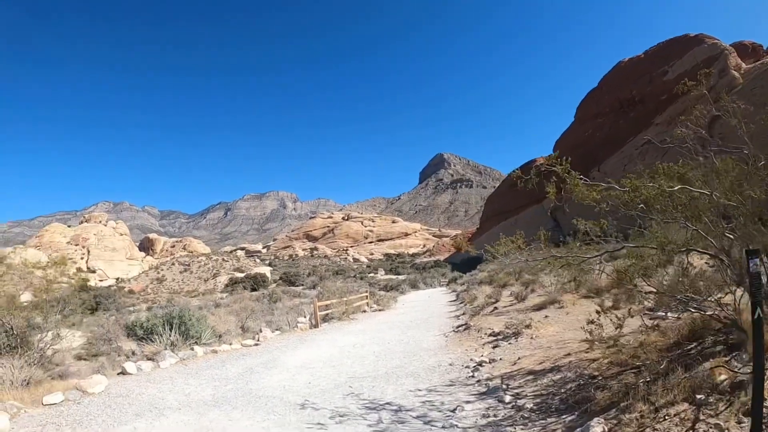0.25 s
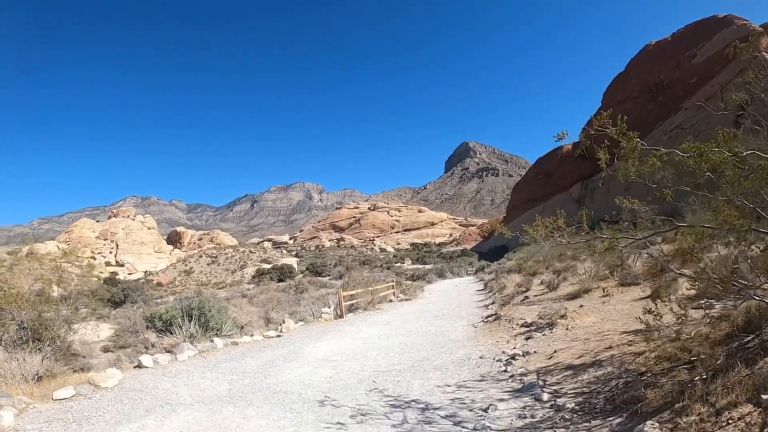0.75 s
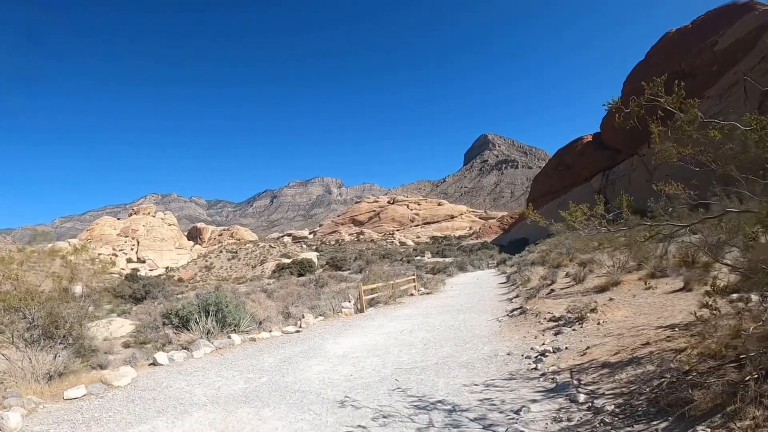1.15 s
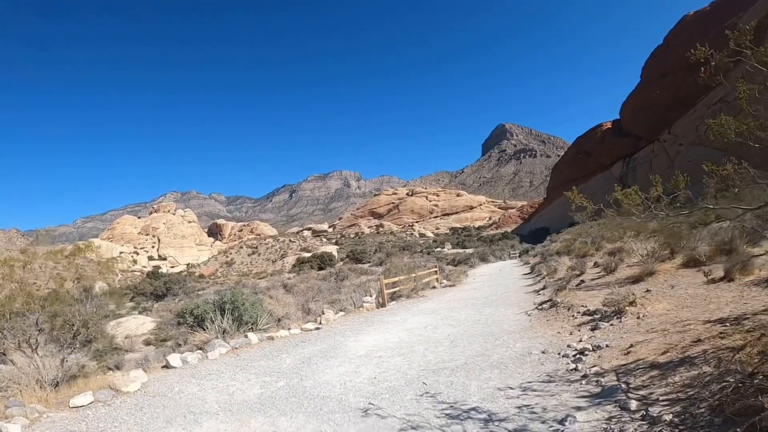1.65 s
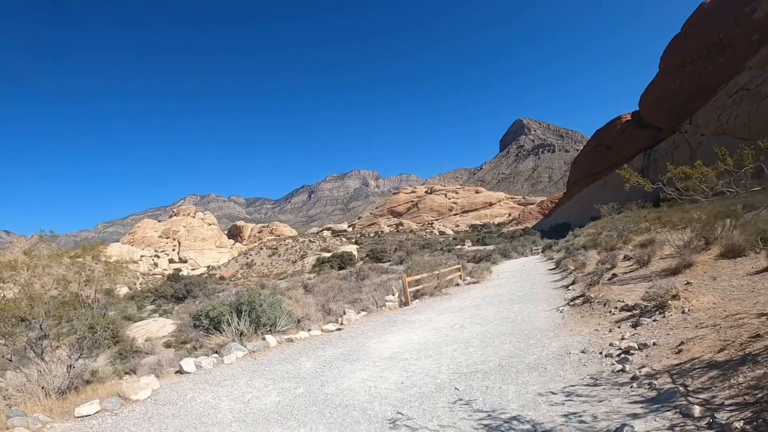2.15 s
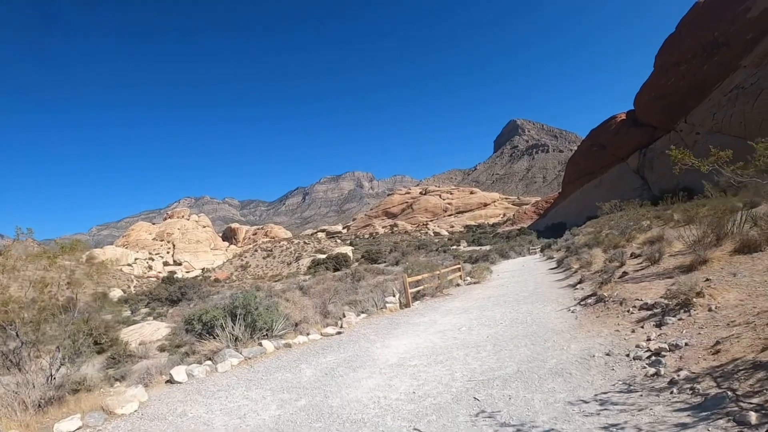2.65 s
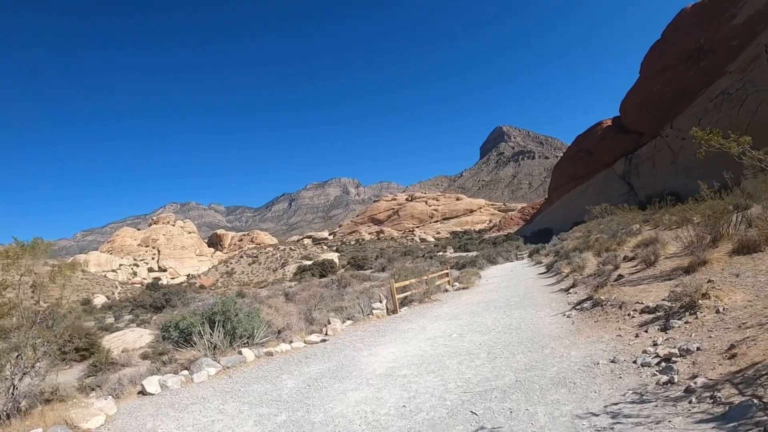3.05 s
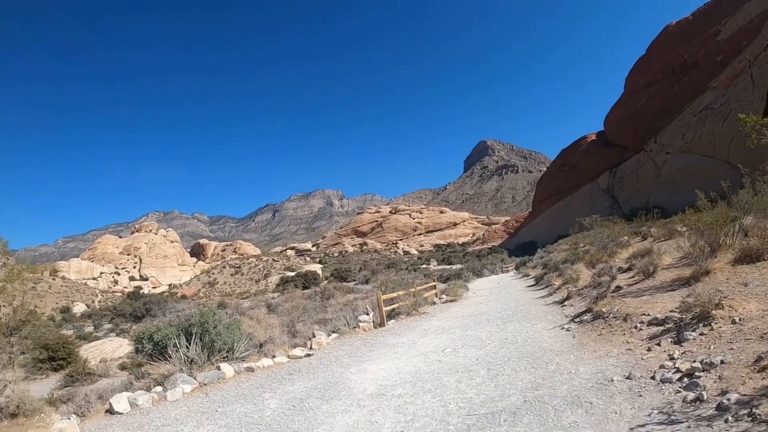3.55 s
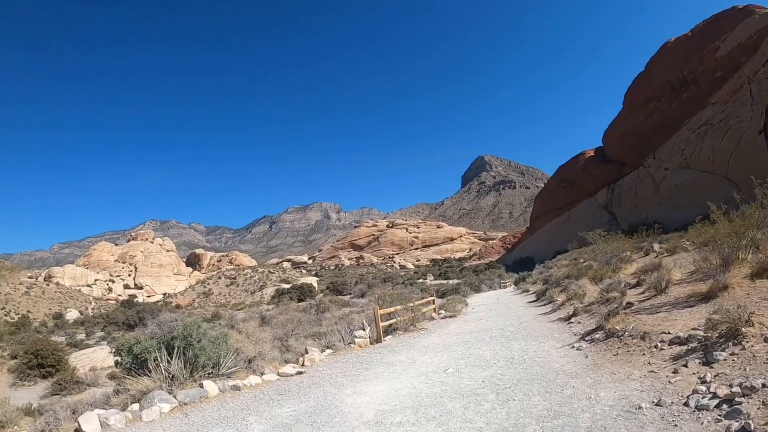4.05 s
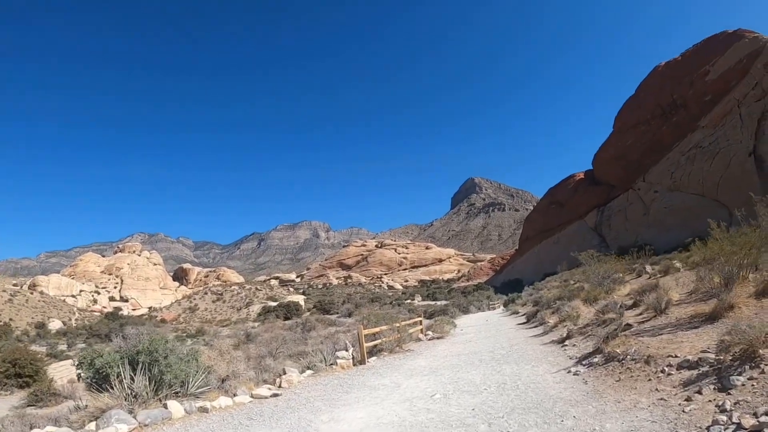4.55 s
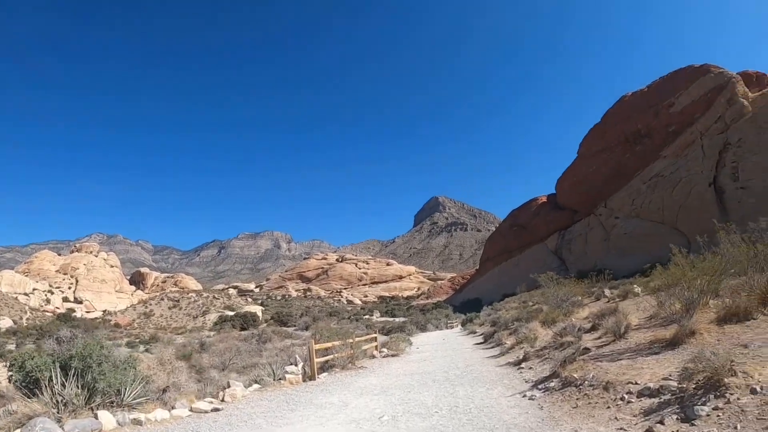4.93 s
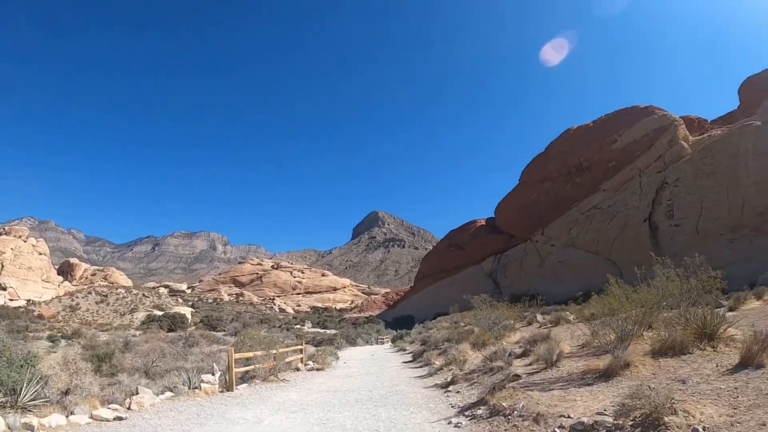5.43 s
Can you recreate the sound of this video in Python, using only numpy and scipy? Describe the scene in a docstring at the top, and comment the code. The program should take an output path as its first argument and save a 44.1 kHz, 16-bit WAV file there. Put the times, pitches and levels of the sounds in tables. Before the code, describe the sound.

Footsteps crunch steadily on gravel over low wind rumble, ending with a clothing rustle and a loud scrape across the microphone.

```python
"""Gravel walk, hand-held in the wind

Shoes crunch along a gravel trail: stones grind and crack as each foot rolls from heel to toe.
Wind buffets the two microphone ports of a small hand-held camera, over a far engine drone,
and a metal fitting tinkles now and then. Near the end clothing swishes, then a hand rubs
the case and scrapes across the left port, overloading it."""
import sys
import numpy as np
from scipy import signal
from scipy.fft import rfft, irfft, next_fast_len
from scipy.io import wavfile
from scipy.ndimage import uniform_filter1d

SR = 44100
rng = np.random.default_rng(int(sys.argv[2]) if len(sys.argv) > 2 else 0)


def pcm_store(signal):
    """Save signal as 16-bit PCM."""
    levels = np.round(np.clip(np.atleast_2d(signal), -1, 1) * 32767)
    wavfile.write(sys.argv[1], SR, levels.astype(np.int16).T)


N = 250929


def amp(db):
    """Decibels to gain."""
    return 10 ** (np.asarray(db) / 20)


def unit_rms(x):
    """Scales to rms 1."""
    return x / np.sqrt(np.mean(x ** 2) + 1e-20)


def wander(samples, shape=N):
    """Smooth random modulation at rms 1; more samples make it slower."""
    return unit_rms(uniform_filter1d(uniform_filter1d(rng.standard_normal(shape), samples), samples))


def automation(rows):
    """One curve for each column after the time; the first, a level, is silent outside the rows."""
    time_s, level_db, *others = np.transpose(rows)
    t = np.arange(N) / SR
    fader_db = uniform_filter1d(np.interp(t, time_s, level_db, left=-120, right=-120), size=90)
    return [fader_db] + [np.interp(t, time_s, column) for column in others]


def eq(x, points, phase_rad=0):
    """Shapes x with a curve of (freq_hz, gain_db) points and an optional phase shift."""
    size = next_fast_len(N)
    freq_hz, gain_db = np.transpose(points)
    bins_hz = np.fft.rfftfreq(size, 1 / SR)
    gain = amp(np.interp(np.log(bins_hz + 1), np.log(freq_hz + 1), gain_db))
    return irfft(rfft(x, size) * gain * np.exp(1j * phase_rad), size)[..., :N]


def band(x, lo_hz, hi_hz):
    """Gentle band-pass."""
    return signal.sosfilt(signal.butter(2, [lo_hz, hi_hz], "bandpass", fs=SR, output="sos"), x)


def resonate(x, hz, width_hz):
    """Two resonators in series, whose pitch may glide; comes out at rms 1."""
    carrier = np.exp(2j * np.pi * np.cumsum(hz * np.ones(N)) / SR)
    pole = np.exp(-np.pi * width_hz / SR)
    for _ in range(2):
        x = 2 * (carrier * signal.lfilter([1 - pole], [1, -pole], x / carrier)).real
    return unit_rms(x)


def ring(hz, t60_s, rise_s):
    """A damped ring with a soft attack, peak near 1."""
    t = np.arange(900) / SR
    envelope = (1 - np.exp(-t / rise_s)) * amp(-60 * t / t60_s)
    return envelope / envelope.max() * np.sin(2 * np.pi * hz * t)


def struck(hits, t60_s, rise_s):
    """One ring for each (start_s, level_db, pitch_hz), faded out within 20 ms."""
    out = np.zeros(N)
    fade = np.cos(np.linspace(0, np.pi / 2, 900)) ** 2
    for start_s, level_db, hz in hits:
        out[round(start_s * SR):][:900] += amp(level_db) * ring(hz, t60_s, rise_s) * fade
    return out


def pan(pan_db):
    """Left and right gains, pan_db apart; positive leans left."""
    return amp(np.array([[.5], [-.5]]) * pan_db)


def spread(x, width):
    """Nearly mono: a short scatter is added at one port and subtracted at the other."""
    scatter = rng.standard_normal(200) * np.exp(-np.arange(200) / 25)
    side = width * signal.oaconvolve(x, scatter / np.linalg.norm(scatter))[:N]
    return np.array([x + side, x - side])


def air(level_db=-52):
    """A quiet, wide bed of open air."""
    # tone of the open air: freq_hz, gain_db
    air_eq = [(35, -24), (60, 6), (102, -9), (163, -3), (290, -9), (395, -16), (643, -28), (858, -31),
              (1400, -27.5), (5280, -44), (7530, -38), (10000, -78), (12000, -94.5), (15600, -110),
              (22000, -120)]
    a, b = eq(rng.standard_normal((2, N)), air_eq)
    return amp(level_db) * unit_rms(np.array([a + 0.3 * b, a - 0.37 * b]))


def drone():
    """A far engine: low tones that waver together in pitch and level."""
    # engine tones: pitch_hz, waver_hz, level_db
    tones = [(151.8, 3.16, -48.5), (233.7, 4, -56), (270, 6.9, -57.5)]
    waver = wander(4000)
    return sum(amp(db + 2.8 * waver) * np.sin(2 * np.pi * np.cumsum(hz + waver_hz * waver) / SR)
               for hz, waver_hz, db in tones)


def wind(lumpy_db=3.0, gusty_db=2.0, sway_db=-43.5):
    """Eddies push each port's membrane: lumpy rumble and flutter, over the deep sway of the held case."""
    # wind on the ports: time_s, level_db, flutter_over_rumble_db, pan_db
    breeze = [(0, -39, -13, 1), (.17, -53, -2, -5), (.28, -24.5, -18, -0.5), (.62, -25.5, -15.5, -1.5),
              (.78, -37.5, -6.5, 0), (.94, -46, -8, -1), (1.05, -35.5, -21.5, 0), (1.58, -45.5, -1.5, -1),
              (1.67, -29.5, -17, -0.5), (1.93, -27, -18.5, -1), (2.13, -37.5, -7, -4.5),
              (2.4, -36.5, -5, 1), (2.7, -50.5, 1, -1.5), (3.1, -40.5, -6, -2), (3.47, -36.5, -14, -3.5),
              (3.63, -46, 6, -3.5), (3.72, -31.5, -17.5, 0.5), (3.96, -22.5, -13.5, 7.5),
              (4.03, -15.5, -23, -14.5), (4.17, -29, -9, -9.5), (4.35, -29.5, -5.5, -11),
              (4.45, -22, -1, -18.5), (4.63, -34, -10, -3), (4.86, -18, -3.5, -19), (5.0, -29, -7.5, -6.5),
              (5.25, -39.5, 6, -0.5), (5.52, -33.5, 0, 7), (5.63, -50, -1, -4.5), (5.69, -40, -0.5, 1)]
    level_db, flutter_db, pan_db = automation(breeze)
    a, b = rng.standard_normal((2, N))
    coherence = 0.85 * np.exp(-abs(pan_db) / 14)  # a gust on one port leaves the other alone
    eddies = np.array([a, coherence * a + np.sqrt(1 - coherence ** 2) * b])
    lumps, gusts = wander(900), wander(3000, (2, N))
    rumble = eq(eddies, [(8, -23), (25, 5), (65, 0.5), (110, -11), (200, -31), (500, -140)])
    rumble = unit_rms(rumble) * unit_rms(amp(gusty_db * gusts)) * unit_rms(amp(lumpy_db * lumps))
    flutter = eq(eddies, [(60, -15), (115, -4.5), (200, -11), (330, -21.5), (500, -42.5), (1200, -140)])
    flutter = amp(flutter_db + 2.5 * lumps) * unit_rms(flutter)
    sway = eq(eddies[:, ::-1], [(8, -22), (22, 3.5), (36, -6.5), (60, -33), (200, -140)])
    ratio = amp(pan_db)
    balance = np.array([ratio, np.ones(N)]) * np.sqrt(2 / (1 + ratio ** 2))  # constant power
    return amp(sway_db) * unit_rms(sway) + amp(level_db) * balance * (rumble + flutter)


def wind_thumps():
    """Sudden pushes on the right port's membrane, each with a dip before and after it."""
    # wind buffets: cue_s, relative_db, length_s
    buffets = [(4.019, -2.5, 0.0075), (4.042, -30, 0.0055), (4.111, -10, 0.0052), (4.127, -11.5, 0.008),
               (4.232, -14, 0.0105), (4.27, -15, 0.011), (4.319, -16, 0.0037), (4.396, -14, 0.0062),
               (4.407, -25, 0.0071), (4.437, -14, 0.0058), (4.523, -9, 0.0038), (4.723, -15, 0.0069),
               (4.852, -15.5, 0.019), (4.961, -20, 0.0084), (4.992, -17.5, 0.0039), (5.131, -21.5, 0.01)]
    out, t = np.zeros((2, N)), np.arange(-3000, 3000) / SR
    for cue_s, db, length_s in buffets:
        u = 2 * t / length_s
        centre = round((cue_s + .004) * SR)
        out[1, centre - 3000:centre + 3000] += amp(db + 2.5) * (1 - u ** 2) * np.exp(-u ** 2 / 2)
    return out


def tinkle(pitch_hz=8420):
    """A small metal fitting chatters: quick ticks into one high mode."""
    # ticks of the fitting: start_s, level_db
    ticks = [(0.1083, -41.5), (0.8948, -59), (1.3364, -46), (1.3464, -41), (1.36, -42), (1.3734, -43),
             (1.389, -42.5), (1.404, -49), (1.414, -45), (1.4386, -65), (1.4676, -55), (1.4854, -59),
             (2.1111, -65), (2.1294, -69), (3.1627, -65.5)]
    return struck([(start_s, db, pitch_hz) for start_s, db in ticks], t60_s=0.059, rise_s=0.00061)


def rustle():
    """Clothing swishes, then a hand rubs the case: a midrange body and a bright hiss, wide in stereo."""
    # clothing swish and hand rub: time_s, relative_db, pan_db, swish_over_body_db
    slide = [(4.485, -78, 3, -5), (4.5, -59.5, 3, 3.5), (4.7, -63, -1, -3), (4.72, -75, 0, -5),
             (4.77, -73, -12, -20.5), (4.87, -48.5, 3, -4), (4.95, -48.5, 5, -14), (4.996, -43, 4, -34),
             (5.02, -59, -1, -8), (5.035, -44.5, 4, -9), (5.08, -48, 3, -6), (5.115, -43.5, 2, -21),
             (5.164, -30, 7, -11), (5.23, -44, 13, -24), (5.26, -48, 9, -26), (5.29, -40, 22, -29)]
    # tone of the rustle's body: freq_hz, gain_db
    body_eq = [(290, -27.5), (500, 2.5), (2180, -5.5), (2450, -5), (4380, -11), (7290, -12), (8000, -25),
               (10400, -49), (17600, -120)]
    level_db, pan_db, swish_db = automation(slide)
    a, b = rng.standard_normal((2, N))
    body = band(eq(np.array([a, .5 * a + 1.9 * b]), body_eq), 570, 8800)
    hiss = rng.standard_normal((2, N))
    swish = eq(hiss, [(5000, -23), (7500, 5.5), (10000, -7.5), (13000, -8.5), (15500, -31)])
    return amp(level_db + 0.5) * pan(pan_db) * (unit_rms(body) + amp(swish_db) * unit_rms(swish))


def squeak():
    """A faint, fuzzy whistle of skin on the smooth case."""
    # skin squeak: time_s, level_db, pitch_hz
    glide = [(4.87, -68, 3570), (4.91, -48, 3500), (4.97, -64, 3580), (4.985, -54, 3620), (5.03, -65, 3500)]
    level_db, pitch_hz = automation(glide)
    return amp(level_db) * resonate(rng.standard_normal(N), pitch_hz, width_hz=330)


def scrape(judder_db=1.0, ceiling=0.89):
    """The hand drags across the left port: a rough, low blast that bottoms out the membrane."""
    # two strokes of the hand, each with rows of: time_s, drive_db, brightness_db
    strokes = [
        [(5.27, -49.5, 17), (5.314, -1, -14.5), (5.376, -12, -15.5), (5.4, -47.5, -12)],
        [(5.41, -46.5, -13), (5.444, -28.5, -16), (5.546, -44, -13.5), (5.56, -46, -14)],
    ]
    # tone of the scraped port: freq_hz, gain_db
    port_eq = [(20, -13), (50, -0.5), (110, 3), (220, 0), (350, -1), (500, -7), (1000, -7.5), (2600, -20.5),
               (5000, -39.5), (12000, -65.5)]
    drive_db, bright_db = automation(strokes[0] + strokes[1])
    judder = unit_rms(uniform_filter1d(rng.standard_normal(N), 150))
    friction = eq(rng.standard_normal(N) * amp(judder_db * judder), port_eq)
    blast = unit_rms(band(friction, 13, 1330))
    rasp = amp(np.minimum(bright_db, -8) + 6.5) * unit_rms(band(friction, 984, 11000))
    left = ceiling * np.tanh(amp(drive_db + 5) * (blast + rasp) / ceiling)
    # the right port hears it a quarter cycle ahead, without deep bass or treble
    right = eq(left, [(90, -41.5), (150, -0.5), (900, 2.5), (2500, -5.5), (8000, -14)], np.pi / 2)
    return np.array([left, right])


def scuffs():
    """The swinging sole grazes the ground: a soft, grainy brush of rubber over sand."""
    # brushes of the sole: middle_s, length_s, level_db
    brushes = [(1.2, .16, -61.5), (2.359, 0.07, -76), (3.39, 0.063, -67), (4.354, 0.075, -60.5)]
    t = np.arange(N) / SR
    grains = rng.standard_normal(N) * rng.exponential(1, N)
    swells = sum(amp(db) * np.exp(-(2 * (t - middle_s) / length_s) ** 2)
                 for middle_s, length_s, db in brushes)
    return swells * resonate(grains, hz=1250, width_hz=800)


def soles():
    """The dull knock of rubber on packed ground."""
    # sole impacts: start_s, level_db, pitch_hz
    knocks = [(0.268, -34.5, 213), (0.771, -36.5, 229), (1.494, -30.5, 244), (2.056, -34, 241),
              (2.598, -30, 295), (2.998, -19.5, 435), (3.105, -26.5, 258), (3.473, -48, 202),
              (3.623, -25.5, 214), (4.01, -26, 256)]
    return struck(knocks, t60_s=0.025, rise_s=0.0014)


def foot_load():
    """Weight rolls from heel to toe, then stones trickle: the gravel's level, grit and pan curves in dB."""
    # footsteps: land_s, heel_s, heel_db, dip_db, ball_s, ball_db, toe_s, toe_db,
    # trickle_before_db, trickle_after_db, grit_db, pan_db
    steps = [(0.058, 0.082, -43.5, -52, .21, -47.5, .28, -52.5, -57.5, -83.5, -8.5, -0.5),
             (0.638, 0.724, -35.5, -45, 0.769, -34, 0.84, -49, -62, -76.5, -14.5, -0.5),
             (1.285, 1.338, -32.5, -45.5, 1.415, -41, 1.48, -52, -54.5, -67.5, -15.5, 0),
             (1.87, 1.893, -29, -49, 1.943, -35, 2.05, -50, -55.5, -83, -11, -0.5),
             (2.427, 2.48, -27.5, -37.5, 2.525, -36.5, 2.603, -54, -57, -56, -9.5, -0.5),
             (2.958, 3.012, -17.5, -37, 3.048, -23.5, 3.093, -42, -58, -66, -27.5, 0.5),
             (3.467, 3.494, -29.5, -39, 3.57, -31.5, 3.605, -48, -54, -70, -14, 0.5),
             (4.003, 4.052, -33.5, -45.5, 4.11, -47.5, 4.155, -53.5, -57, -69.5, -8.5, 0.5),
             (4.498, 4.556, -35.5, -42, 4.605, -37.5, 4.67, -52, -60, -63.5, -8.5, 2.5),
             (5.019, 5.035, -35.5, -39, 5.06, -38, 5.335, -57, -46, -53.5, -17, 2),
             (5.586, 5.629, -40.5, -48, 5.59, -45, 5.675, -63, -52.5, -64, -19.5, -9.5)]
    points = []
    for (land_s, heel_s, heel_db, dip_db, ball_s, ball_db, toe_s, toe_db,
         before_db, after_db, grit_db, pan_db) in steps:
        roll = [(land_s, before_db, grit_db),
                (land_s + .008, heel_db - 14, grit_db),  # first touch
                (heel_s, heel_db, grit_db),
                (ball_s - .35 * (ball_s - heel_s), dip_db, grit_db),  # the weight shifts
                (ball_s, ball_db, grit_db),
                (toe_s, toe_db, grit_db - 4.5),  # the crunch darkens toward the toe
                (toe_s + .05, after_db, grit_db)]  # the stones settle
        points += [(*point, pan_db) for point in roll]
    opening = (0.00092, *points[0][1:])
    return automation(sorted([opening] + points))


def cracks(snap_db=-5, crumbs_db=-13):
    """Single stones crack: a ring, a dry snap, a sharp edge, a low knock, and crumbs that follow."""
    # cracking stones: start_s, level_db, pitch_hz, edge_over_ring_db
    stones = [(0.0744, -16, 1740, -21), (0.0886, -27, 4470, -20), (0.2088, -25.5, 1950, 0.5),
              (0.2334, -32, 2380, -7), (0.2684, -22.5, 1910, -20), (0.4252, -41.5, 1550, -24),
              (0.528, -43.5, 1340, -2), (0.619, -38, 1220, -15), (0.6472, -28, 1680, -24),
              (0.6667, -29, 1880, -17), (0.7209, -17, 2280, -22), (0.7252, -20.5, 3280, -9),
              (0.7564, -27, 2130, -27), (0.7719, -9.5, 3090, -17), (0.794, -22.5, 2360, -5),
              (0.8122, -22, 3510, -7), (0.834, -25.5, 1590, -28), (0.8719, -29, 1390, -28),
              (1.0657, -42, 1450, -3), (1.1436, -32.5, 1280, -11), (1.263, -35, 1230, -7),
              (1.2932, -23, 4220, -16), (1.3218, -14.5, 1840, -28), (1.4164, -24.5, 1950, -28),
              (1.4589, -26.5, 2170, -32), (1.4975, -35, 1690, -29), (1.6867, -45, 1220, -21),
              (1.8254, -40, 3750, -25), (1.8737, -18.5, 3660, -17), (1.8816, -14.5, 2070, -28),
              (1.8937, -19, 3900, -11), (1.938, -19.5, 2340, -25), (1.954, -28, 1900, -17),
              (2.0309, -24, 3290, -6.5), (2.0562, -28, 1250, -24), (2.1438, -37, 2530, 3),
              (2.3594, -37.5, 4530, -4), (2.392, -44, 4340, 3), (2.4215, -33.5, 3000, 0),
              (2.4388, -19.5, 1700, -15), (2.4563, -10.5, 2210, -31), (2.58, -37, 1420, -23),
              (2.5998, -23, 1550, -10), (2.6614, -35.5, 4840, -6), (2.6832, -44, 2280, 4),
              (2.6966, -32, 3850, -8), (2.7317, -39, 2100, -13), (2.7616, -43, 4520, -8),
              (2.786, -40, 3200, 0), (2.812, -38, 2583, -4), (2.8419, -33.5, 3750, 1.5),
              (2.867, -44, 3430, 4), (2.909, -38, 4630, -6), (2.9648, -30.5, 1940, -17.5),
              (2.9746, -16.5, 1730, -21), (2.9806, -8.5, 3350, -22.5), (3, 0.5, 1470, -26),
              (3.0164, -6, 2340, -28), (3.0414, -1, 2190, -27.5), (3.0949, -30.5, 3680, -22),
              (3.1044, -23.5, 1950, -13), (3.2773, -35, 3830, -22), (3.322, -38.5, 3940, 3),
              (3.3639, -43, 1220, -18), (3.4097, -43, 4220, -1), (3.4403, -23.5, 2950, -8),
              (3.4743, -18.5, 1650, -7), (3.487, -18, 2980, -4.5), (3.5091, -7, 3400, -32),
              (3.5419, -22.5, 2000, -13), (3.5893, -20, 3820, -34), (3.625, -29.5, 1670, -19),
              (3.8058, -46, 1210, -15.5), (3.8216, -42.5, 1407, -5), (3.8908, -41.5, 1280, 3.5),
              (3.9447, -31.5, 5480, -2), (4.01, -23, 1370, -2), (4.0533, -17.5, 1820, -18.5),
              (4.11, -26, 3850, -24), (4.1387, -31.5, 2260, -26), (4.146, -27.5, 1260, -20),
              (4.4957, -42.5, 1750, 6), (4.5305, -26.5, 1750, -8), (4.5588, -10.5, 1966, -32),
              (4.593, -31, 1990, 7), (4.6682, -29.5, 2970, -20), (4.6852, -27.5, 1700, -22),
              (4.7091, -30, 2070, -25), (4.9884, -23.5, 4200, -32), (5.0312, -25, 1800, -12),
              (5.044, -22, 1900, -20), (5.0858, -17.5, 1800, -27), (5.107, -18.5, 1230, -32),
              (5.1375, -16, 3180, -22), (5.5496, -32.5, 1190, -29), (5.6018, -34, 1620, -20),
              (5.6176, -32, 1940, -25), (5.6397, -26.5, 2320, -29), (5.656, -35, 2060, -15)]
    out, t = np.zeros(N + 900), np.arange(900) / SR
    burst = (t / .0003) ** 2 * np.exp(-t / 0.00035)  # the break lasts about a millisecond
    crumble = amp(-60 * t / 0.051) * np.minimum(t / 0.00077, 1)
    fade = np.minimum(4 - 4 * t / t[-1], 1)
    for start_s, level_db, hz, edge_db in stones:
        snap_noise, edge_noise, crumb_noise = rng.random((3, 900)) - .5
        snap = band(band(burst * snap_noise, 1100, 5200), 900, 5600)
        edge = band(burst * edge_noise, 3700, 10500)
        crumbs = band(crumble * crumb_noise ** 3, 1100, 4300)
        knock_hz, knock_db = 560 + 300 * crumb_noise[0], -22 + 9.5 * crumb_noise[1]
        crack = ring(hz, t60_s=0.0038, rise_s=0.00084) * (1 - np.exp(-t / 0.00053))
        crack += amp(snap_db) * snap / abs(snap).max() + amp(edge_db) * edge / abs(edge).max()
        crack += amp(knock_db) * ring(knock_hz, t60_s=0.016, rise_s=0.0011)
        crack += amp(crumbs_db) * crumbs / abs(crumbs).max() * fade
        out[round(start_s * SR):][:900] += amp(level_db) * crack
    out = eq(out[:N], [(7500, 0), (10000, -20.5), (15000, -31.5)])  # the ports roll off the top
    return spread(out, width=0.13)


def grind(level_db, grit_db, uneven_db=3.0, clump_db=4.0, ring_cycles=3.6, sand_gain=0.76):
    """Many small stones knock together in clumps, each with its own short ring, over a hiss of sand."""
    # tone of the gravel: freq_hz, gain_db
    gravel_eq = [(180, -55.5), (300, -1.5), (550, -30), (943, -8.5), (1080, 3.5), (2280, 6.5), (2650, 2),
                 (3440, 4), (4320, -0.5), (7540, -7.5), (12100, -60), (15000, -67)]
    clumps = unit_rms(amp(clump_db * wander(220)))
    knocks_per_s = 1200 * amp(.15 * (level_db + 40))  # more weight moves more stones
    strength = amp(uneven_db * np.minimum(rng.exponential(1, N), 4))
    hits = strength * (rng.random(N) < knocks_per_s / SR)
    stone, knocks = rng.integers(0, 24, N), np.zeros(N)
    for k, hz in enumerate(np.geomspace(600, 9000, num=24)):
        knock = ring(hz, t60_s=ring_cycles / hz, rise_s=0.087 / hz)
        knocks += signal.oaconvolve(hits * (stone == k), knock / np.linalg.norm(knock) * np.sqrt(hz))[:N]
    knocks = unit_rms(knocks / np.sqrt(knocks_per_s))  # density changes the texture, not the level
    gravel = knocks + sand_gain * rng.standard_normal(N)
    spray = 2.6 + uniform_filter1d(abs(gravel), 90)  # dust sprays with each knock
    grit = band(rng.standard_normal(N) * spray, 4100, 22000)
    grit = eq(grit, [(6000, 2), (8000, -7.5), (10000, -17), (15000, -36.5)])
    gravel = eq(gravel * clumps, gravel_eq)
    low_db = -8 - .2 * (level_db + 35.5)  # the low stones' share shrinks under load
    crunch = unit_rms(band(gravel, 890, 6300)) + amp(low_db) * unit_rms(band(gravel, 410, 667))
    crunch += amp(grit_db - 0.0013 * (level_db + 47.5)) * unit_rms(grit)
    return amp(level_db) * spread(crunch, width=0.26)


def scene():
    """The walker, the outdoors, and the clothing and handling noise, mixed at the two ports."""
    level_db, grit_db, pan_db = foot_load()
    walker = pan(pan_db) * (grind(level_db, grit_db) + cracks()) + soles() + scuffs()
    outdoors = wind() + wind_thumps() + air() + drone()
    return walker + outdoors + tinkle() + rustle() + squeak() + scrape()


def record(dry, cutoff_hz=15700):
    """The converter clips at full scale, then a steep low-pass trims the top."""
    clipped = np.clip(dry, -1, 1)
    lowpass = signal.firwin(511, cutoff_hz, window=("kaiser", 9), fs=SR)
    return np.clip(signal.oaconvolve(clipped, lowpass[None], "same"), -1, 1)


dry = scene()
out = record(dry)
pcm_store(out)
```